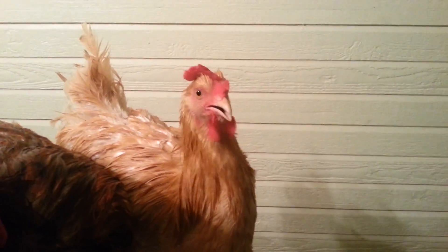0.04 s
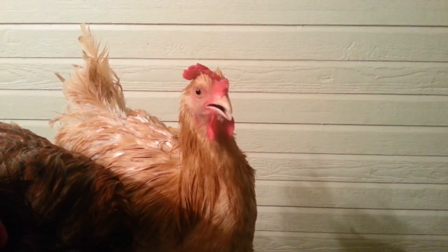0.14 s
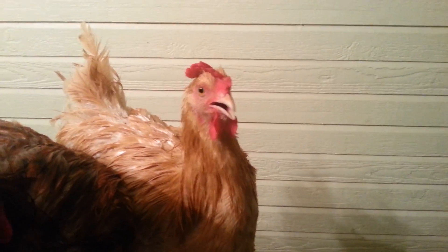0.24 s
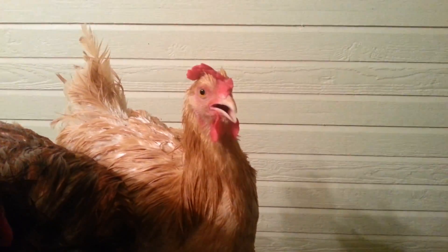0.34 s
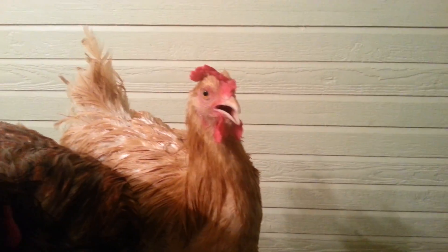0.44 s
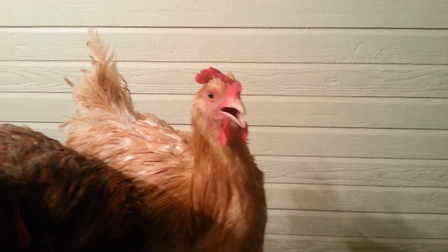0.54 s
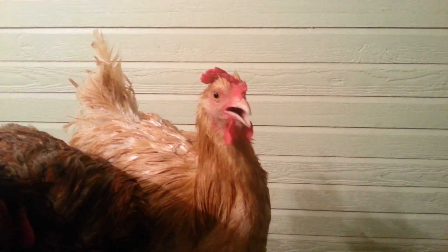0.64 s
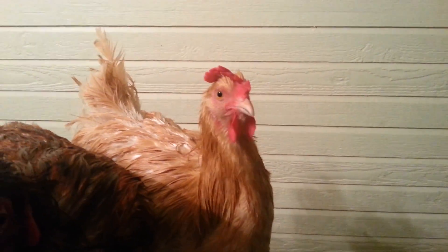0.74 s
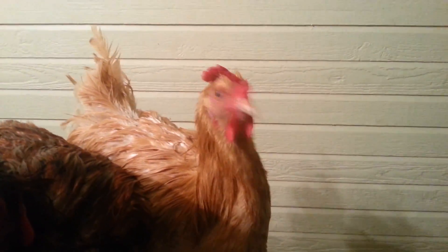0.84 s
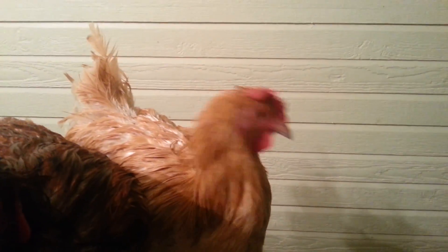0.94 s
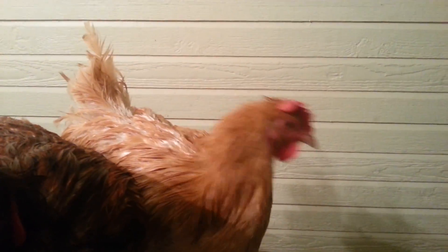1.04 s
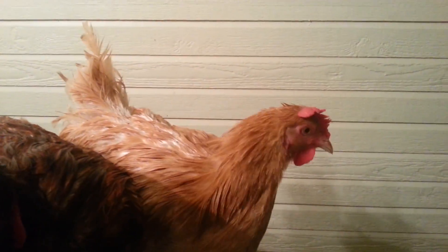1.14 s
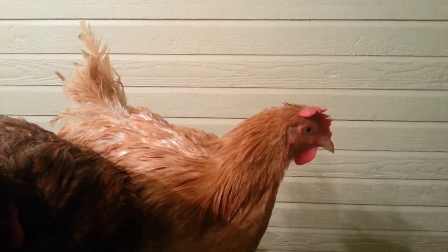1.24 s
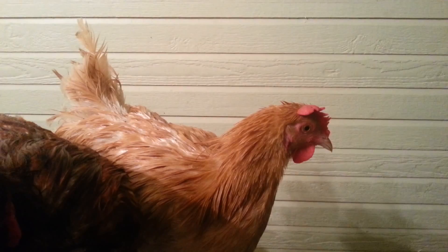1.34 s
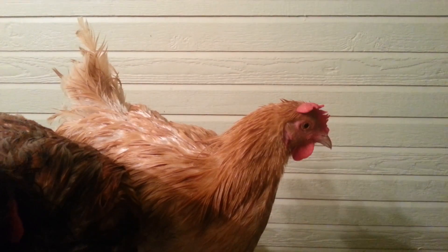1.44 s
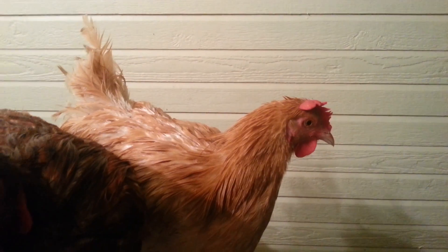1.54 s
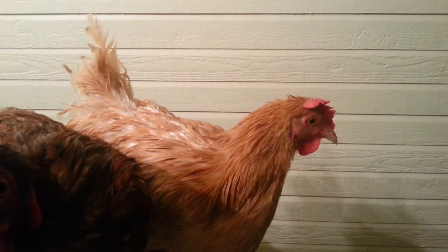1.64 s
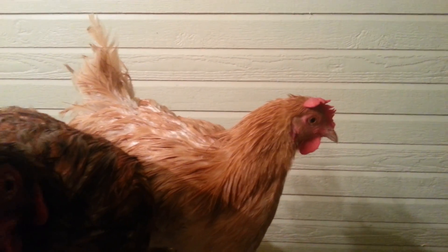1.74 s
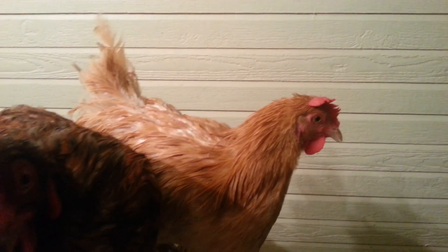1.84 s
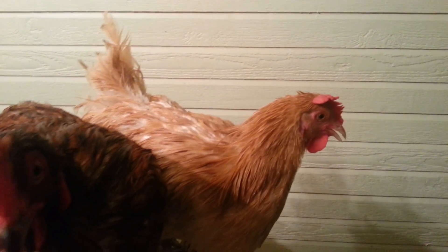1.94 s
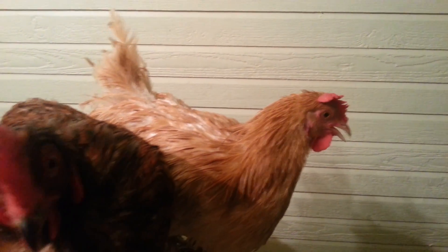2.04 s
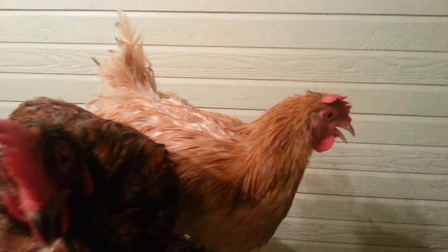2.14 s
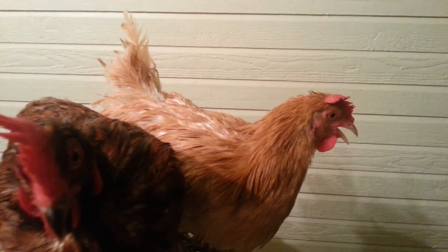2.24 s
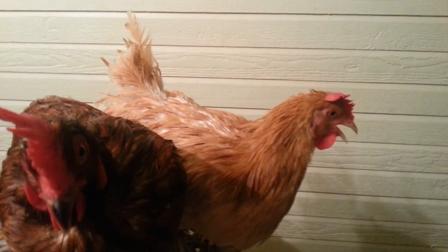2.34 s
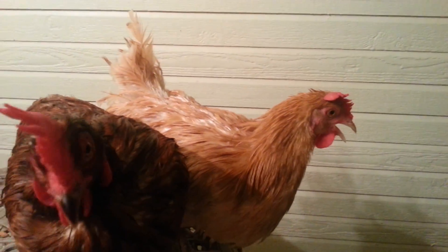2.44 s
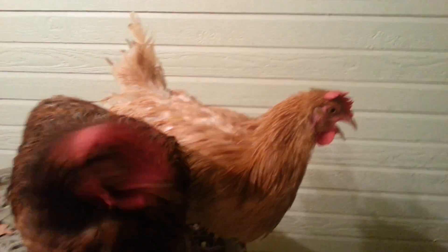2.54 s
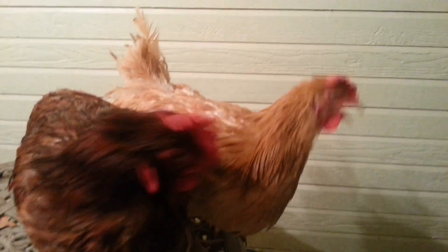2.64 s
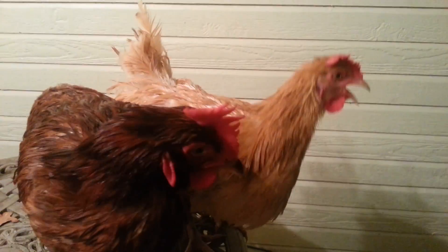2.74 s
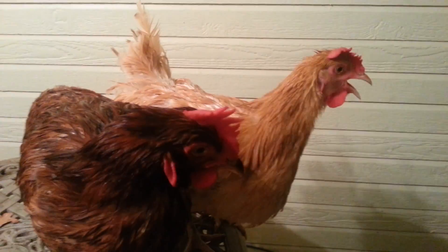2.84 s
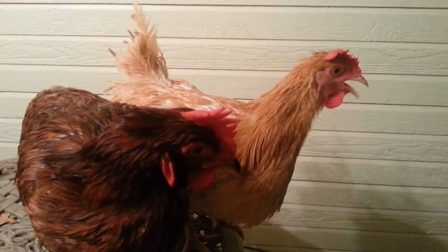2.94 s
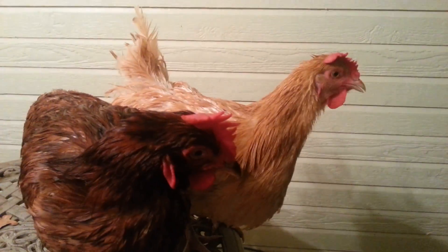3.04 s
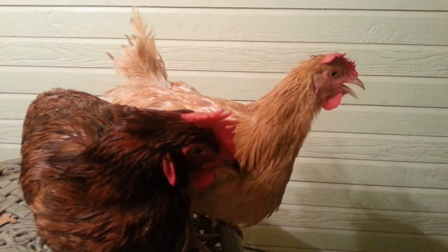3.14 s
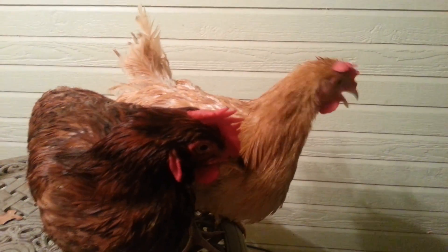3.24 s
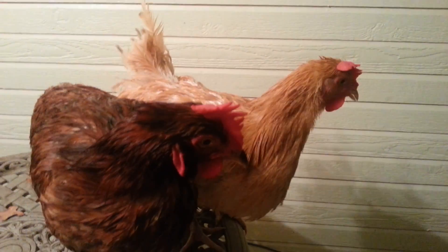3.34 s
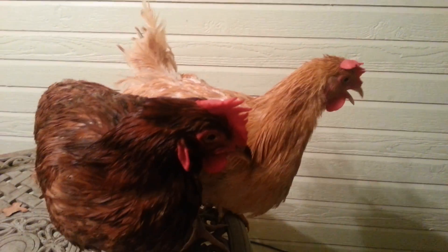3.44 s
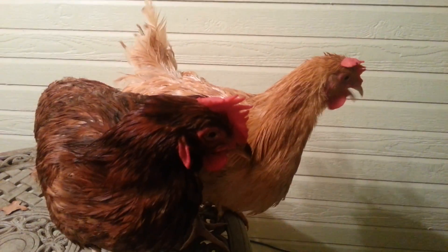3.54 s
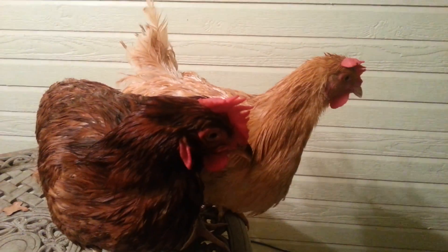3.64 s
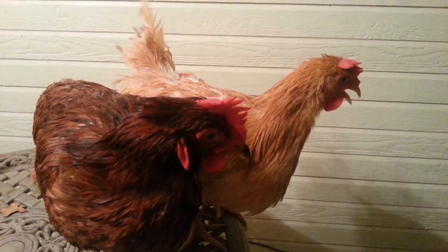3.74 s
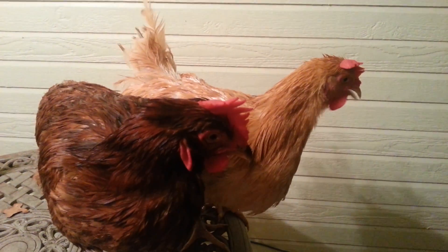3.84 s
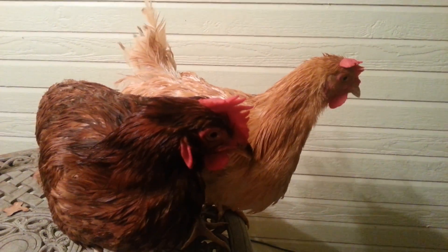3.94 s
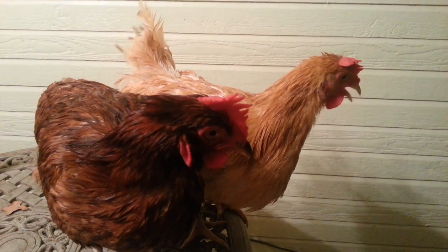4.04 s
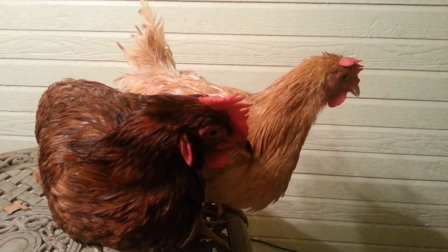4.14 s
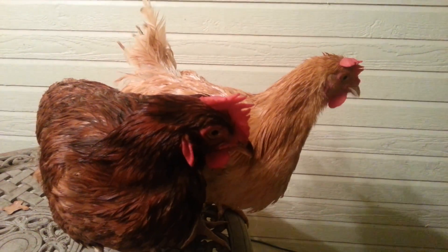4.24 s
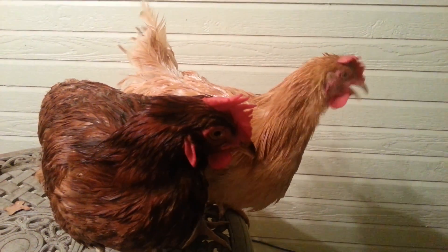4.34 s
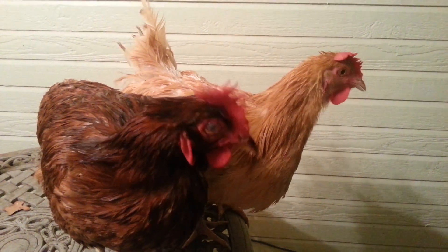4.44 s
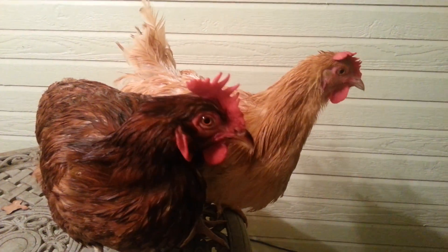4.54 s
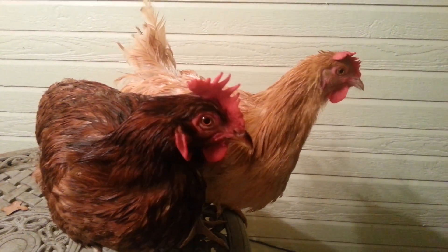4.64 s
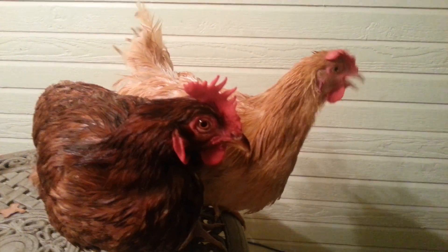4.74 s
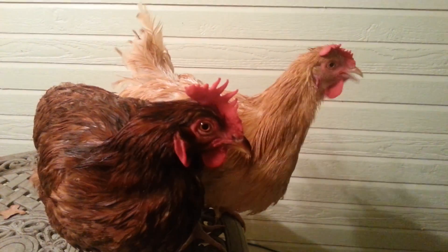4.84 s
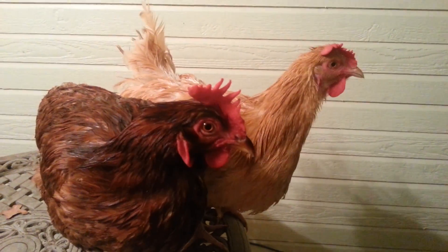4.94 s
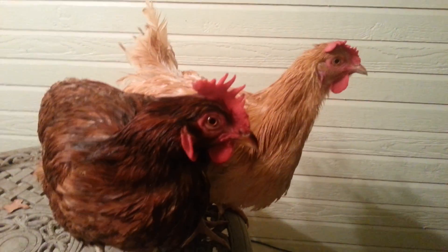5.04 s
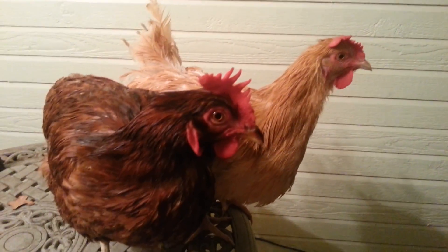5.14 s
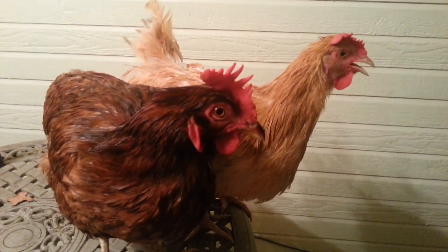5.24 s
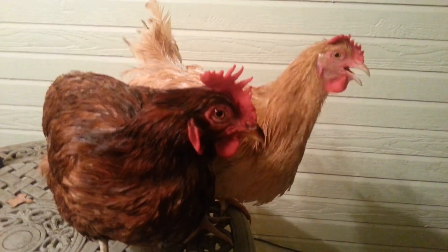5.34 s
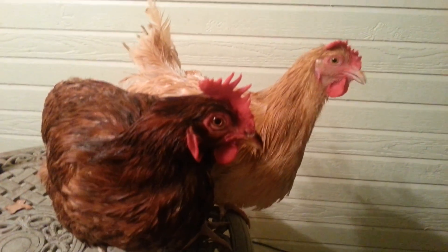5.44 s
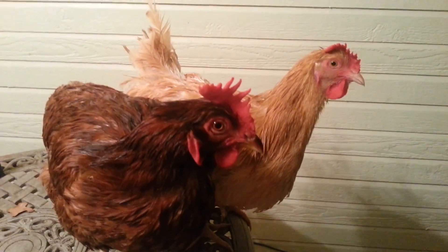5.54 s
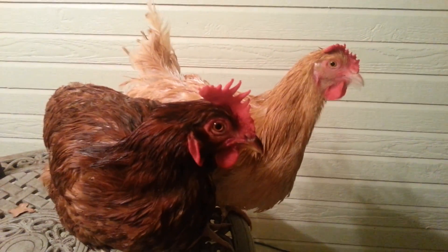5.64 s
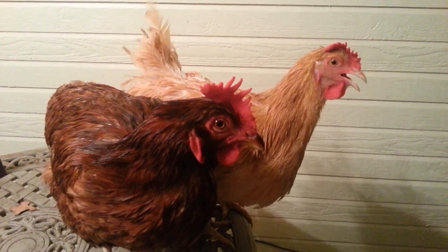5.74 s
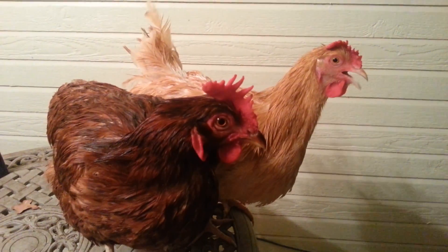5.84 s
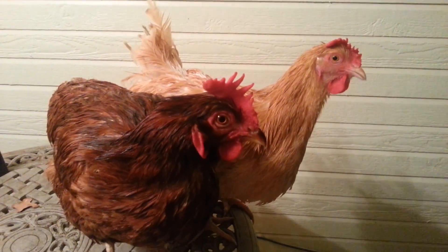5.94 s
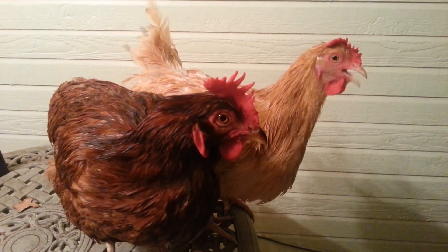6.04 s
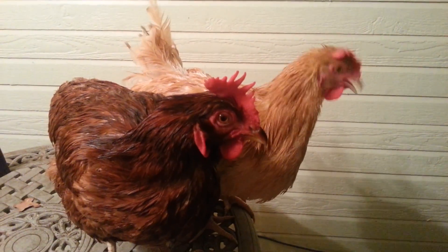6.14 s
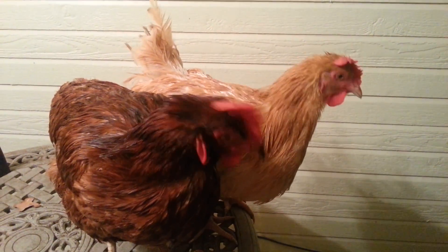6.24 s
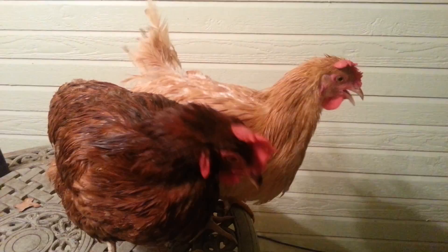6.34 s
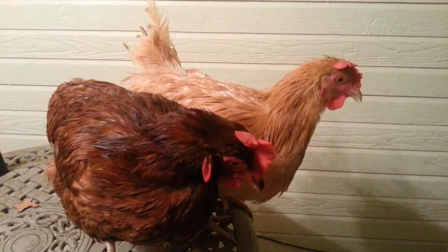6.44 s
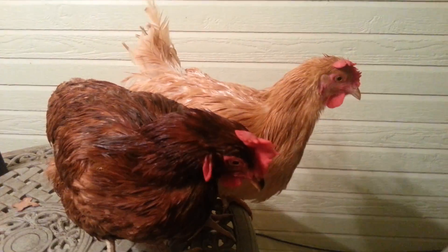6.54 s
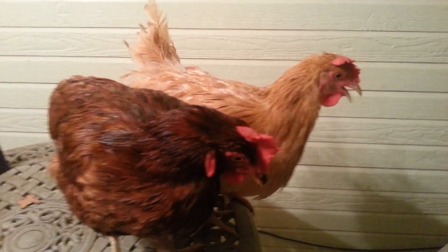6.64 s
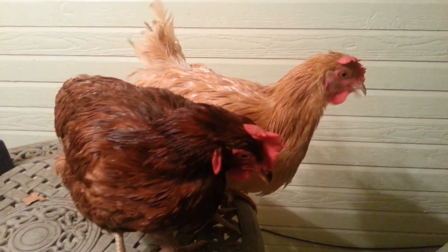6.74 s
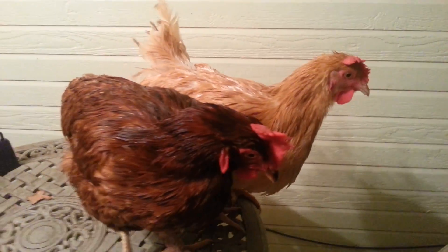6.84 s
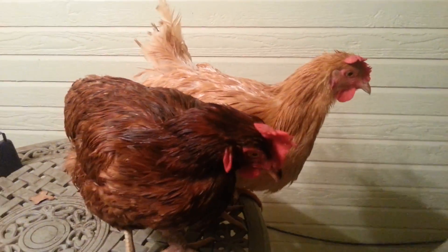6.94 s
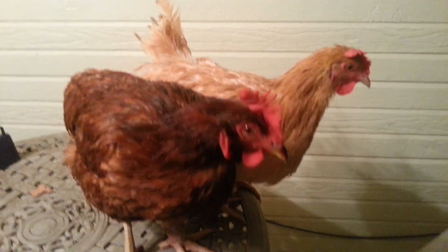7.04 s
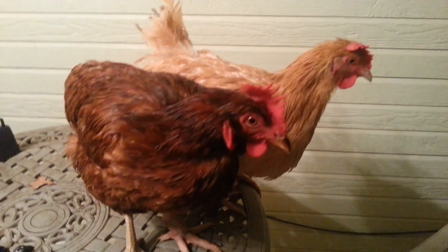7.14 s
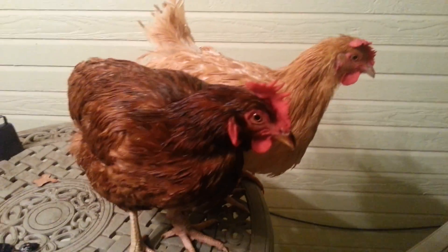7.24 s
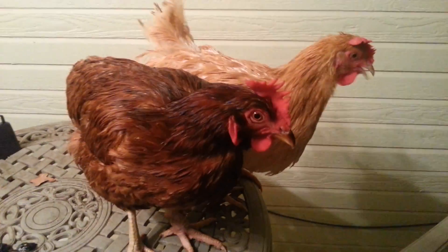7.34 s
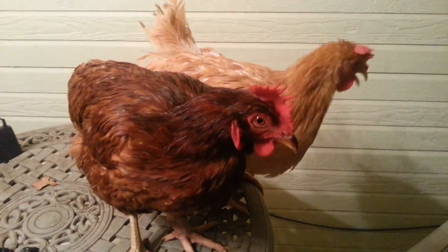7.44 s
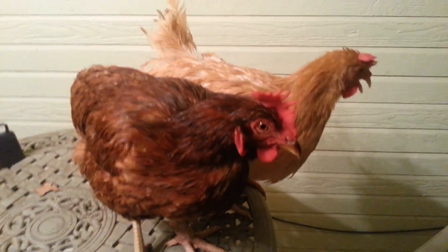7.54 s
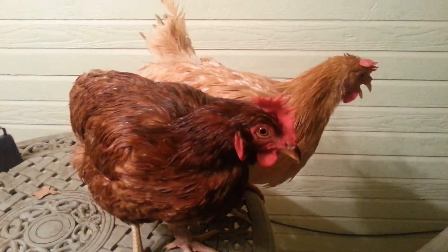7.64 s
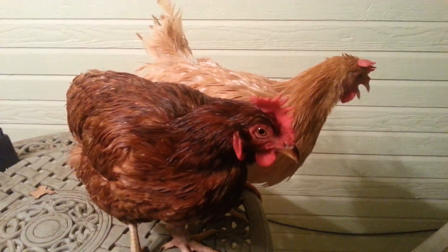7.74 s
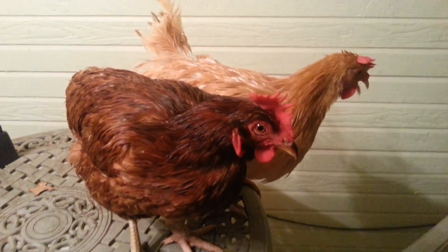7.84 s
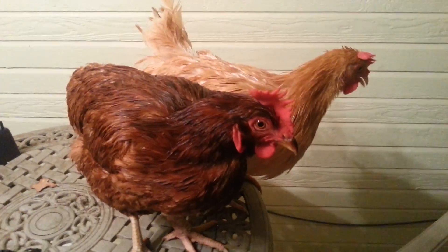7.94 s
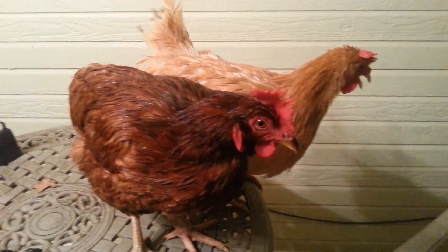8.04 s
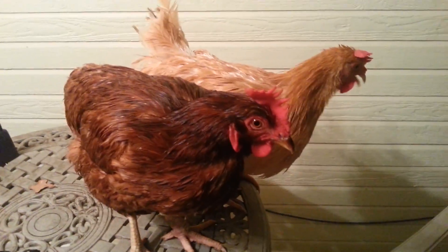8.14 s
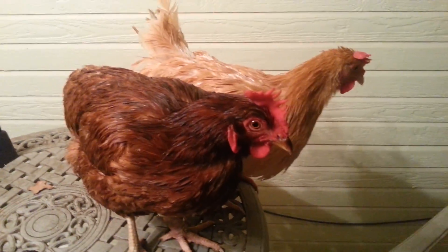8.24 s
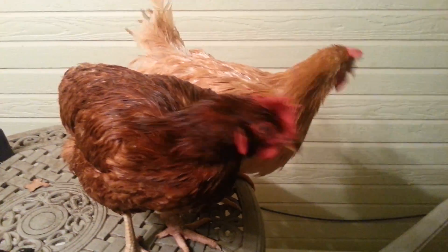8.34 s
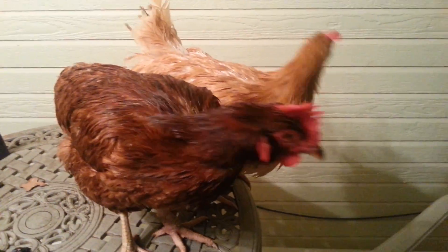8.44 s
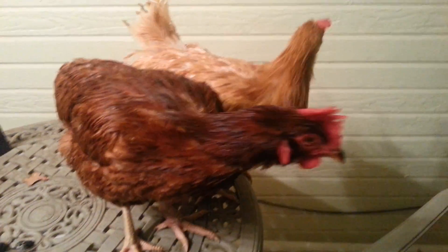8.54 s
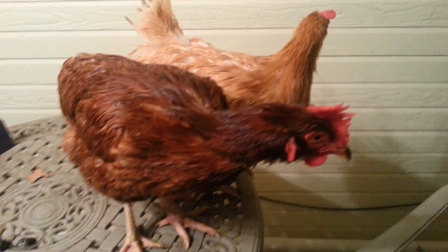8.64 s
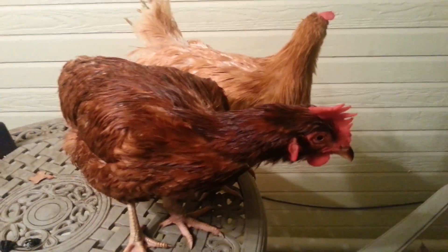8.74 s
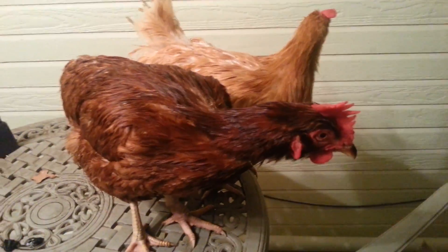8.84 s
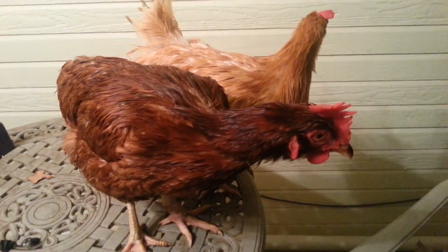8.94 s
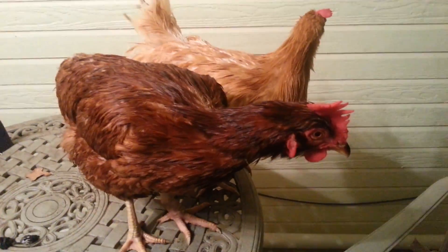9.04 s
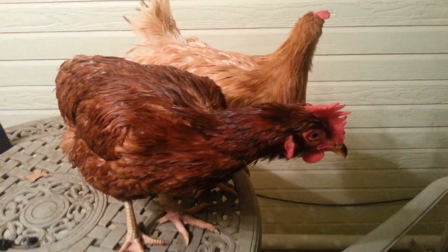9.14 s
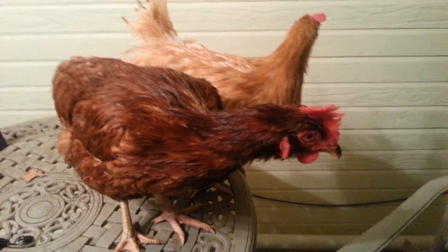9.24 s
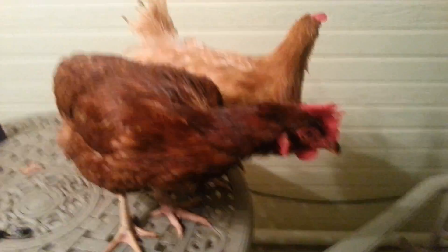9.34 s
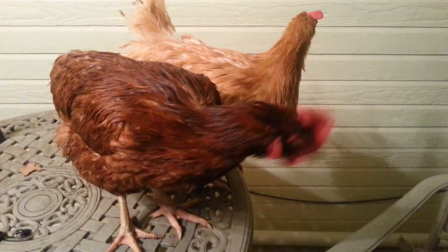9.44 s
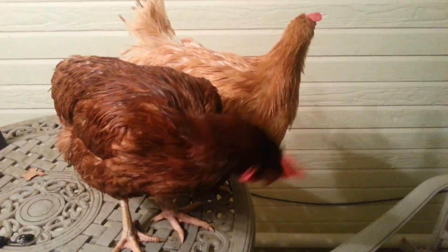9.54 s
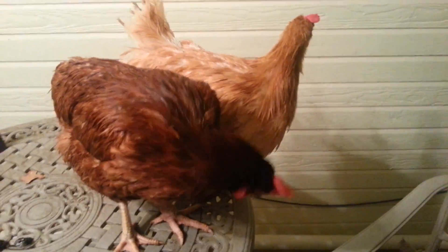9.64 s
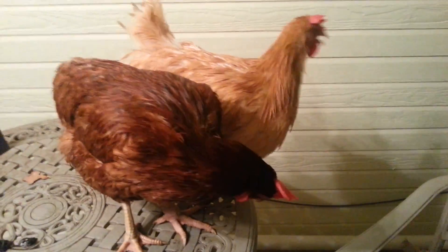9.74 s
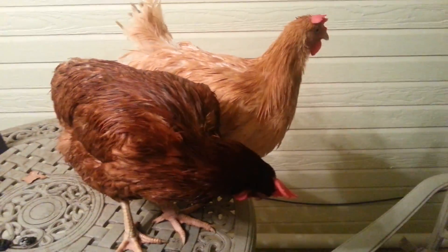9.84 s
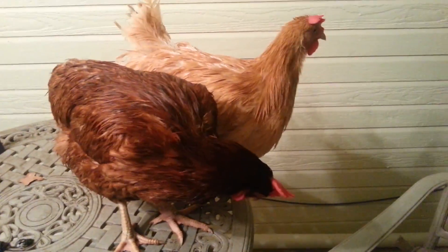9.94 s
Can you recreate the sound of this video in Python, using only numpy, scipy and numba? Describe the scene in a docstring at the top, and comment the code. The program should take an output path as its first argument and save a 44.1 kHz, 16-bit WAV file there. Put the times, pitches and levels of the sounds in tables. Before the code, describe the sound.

On a patio at night, a hen close to a stereo microphone opens mid-squawk, harsh and raspy. After a pause with tiny claw ticks she gives a longer squawk that breaks into clear tone, while a second hen adds one low cluck. A run of short clucks follows, then another squawk and more clucks. Nearby wall and table reflect slightly; soft air noise and low hum lie beneath.

```python
"""A hen's harsh squawk comes first, close to a stereo microphone on a patio at night, by a sided wall.
She stands on a table and goes on squawking and clucking: two membranes of the syrinx beat against
each other as a rasp, then her calls snap into a clear tone, coloured by windpipe and beak.
A second hen gives one low cluck from pulses in a single resonance; claws tick on the table as noise bursts.
Table and wall return echoes; behind lie shaped outdoor noise, a low hum and a faint high whine."""
import sys
import numpy as np
from scipy import signal
from scipy.fft import rfft, irfft, next_fast_len
from scipy.io import wavfile
from scipy.ndimage import uniform_filter1d, minimum_filter1d, map_coordinates
from numba import njit

SR = 44100
rng = np.random.default_rng(int(sys.argv[2]) if len(sys.argv) > 2 else 0)


def unload_wav(signal):
    """Save mono or channel-first audio to the path in sys.argv[1] as 16-bit WAV at rate SR, clipped to [-1, 1]."""
    wavfile.write(
        sys.argv[1],
        SR,
        np.round(np.clip(np.atleast_2d(signal).T, -1, 1) * 32767).astype(np.int16),
    )


N = 440118
TIME = np.arange(N) / SR
SIZE = next_fast_len(N + SR // 2)  # leaves room for the patio's tail
FREQ = np.fft.rfftfreq(SIZE, 1 / SR)


def amp(db):
    """Decibels to gain."""
    return 10 ** (np.asarray(db) / 20)


def unit(x):
    """Scaled to rms 1."""
    return x / np.sqrt(np.mean(x ** 2) + 1e-20)


def ramp(x):
    """Held between 0 and 1."""
    return np.clip(x, 0, 1)


def mix(a, b, share):
    """From a at share 0 to b at share 1."""
    return a + (b - a) * share


def along(points, hz=FREQ):
    """(f/Hz, value) points read on a log axis."""
    f, v = np.transpose(points)
    return np.interp(np.log(hz + 1), np.log(f + 1), v)


def curves(rows, t=TIME):
    """Each column after the time, joined by straight lines."""
    s, *cols = np.transpose(rows)
    return [np.interp(t, s, c) for c in cols]


def wobble(rate):
    """A smooth random curve, rate knots a second."""
    knots = rng.standard_normal(int(N * rate / SR) + 4)
    return map_coordinates(knots, [TIME * rate])


def filtered(x, response):
    """x through a frequency response."""
    return irfft(rfft(x, SIZE) * response, SIZE)[..., :N]


def causal(db):
    """The minimum-phase response with this gain: it rings only after a pulse."""
    cepstrum = irfft(np.log(amp(db)), SIZE)
    cepstrum[1:SIZE // 2] *= 2
    cepstrum[SIZE // 2 + 1:] = 0
    return np.exp(rfft(cepstrum))


def resonance(hz, width_hz):
    """The response of one resonance."""
    return 1j * FREQ * width_hz / (hz ** 2 - FREQ ** 2 + 1j * FREQ * width_hz)


@njit
def ring(x, hz, width_hz):
    """A resonance whose centre glides, with gain about 1 at its peak."""
    out, state = np.zeros(len(x)), 0j
    keep = np.exp(-np.pi * width_hz / SR)
    for i in range(len(x)):
        state = state * keep * np.exp(2j * np.pi * hz[i] / SR) + x[i]
        out[i] = 2 * (1 - keep) * state.real
    return out


def beats(pitch):
    """The times at which a membrane completes a cycle."""
    cycles = np.cumsum(pitch) / SR
    return np.interp(np.arange(1, cycles[-1]), cycles, TIME)


def pulses(times, sizes, order=8):
    """Sharp pulses placed between samples."""
    at = times[:, None] * SR
    taps = np.floor(at) + np.arange(1 - order, order + 1)
    shape = np.sinc(taps - at) * np.cos(np.pi * (taps - at) / (2 * order)) ** 2
    slots = np.clip(taps, 0, N).astype(int)
    return np.bincount(slots.ravel(), (sizes[:, None] * shape).ravel(), N + 1)[:N]


# moments in her calls when the second membrane nearly drops out: [middle t/s, length/s]
LULL_TIMES = [(.147, 0.031), (0.248, 0.032), (2.108, .02), (5.274, 0.0117), (9.36, 0.0231)]
# edge length in s, share of pitch lost, loss in the beak register in dB, rasp approached
LULL_EDGE_S, LULL_SAG, LULL_DB, LULL_RASP = .008, .04, 2.5, 0.17
# the second membrane's pitch over the first: it pulls away during a call, up to a limit
SECOND_RATIO, SECOND_DRIFT_PER_S, SECOND_MOST = 1.44, .3, 1.56
# in the rasp the beak resonance trembles: depth as a share of its pitch, random knots per s
BEAK_FLUTTER, FLUTTER_PER_S = 0.062, 170


def hen(edge_offset_db=2.5):
    """Each call gates the voice; effort and beak opening shift its weight between three registers."""
    gate, age, pitch, rasp, level, beak, edge, beak_hz, upper_hz = gestures()
    lull = sum(ramp((length / 2 - np.abs(TIME - s)) / LULL_EDGE_S + .5) for s, length in LULL_TIMES)
    pitch = pitch * (1 - LULL_SAG * lull)
    rasp = ramp(mix(rasp, LULL_RASP, lull))
    beak = beak - LULL_DB * lull
    second = pitch * np.minimum(SECOND_RATIO + SECOND_DRIFT_PER_S * age, SECOND_MOST)
    beak_hz = beak_hz * (1 + BEAK_FLUTTER * rasp * wobble(FLUTTER_PER_S))
    voice = throat(syrinx(pitch, second, rasp), rasp, beak_hz, upper_hz)
    # throat, beak and shrill edge registers, each evened out before its own level is applied
    below_beak = 1 / (1 + (FREQ / 1060) ** 20)
    below_edge = 1 / (1 + (FREQ / 2500) ** 20)
    bands = np.array([below_beak, below_edge - below_beak, 1 - below_edge])
    registers = filtered(voice, bands)
    strength = np.sqrt(np.abs(uniform_filter1d(registers ** 2, size=1100, axis=1)) + 1e-12)
    gains = gate * amp([level, beak, edge + edge_offset_db])
    return np.sum(gains * registers / strength, axis=0)


# the clucks, before the edge offset in hen(): [start t/s, length/s, swell/s, fall/s,
# break into tone after/s, pitch f/Hz at the break, later pitch of the tone f/Hz,
# rasp left in the tone/0-1, throat level/dB, beak register in the rasp and in the tone/dB re throat,
# shrill edge/dB re throat, beak resonance f/Hz, upper resonance f/Hz]
CLUCK_CALLS = [ (3.095, 0.19, 0.02, 0.041, 0.055, 430.3, 467, 0.059, -12.5, 2, -2, -12, 1290, 3164),
               (3.393, 0.15, 0.012, .026, 0.041, 425, 468.2, 0.13, -11.5, -2, -3.5, -13, 1140, 3220),
               (3.7, .13, 0.023, .03, 0.068, 458.6, 462.5, 0.11, -12, 3.5, -5.5, -12.5, 1156, 3200),
               (3.972, 0.12, .02, .03, 0.075, 451.2, 449, 0.14, -12.5, 4, -6.5, -14, 1173, 3170),
               (4.26, .112, 0.02, .024, .028, 380.7, 428, 0.32, -13, 1.5, -3, -13, 1142, 3160),
               (4.677, 0.16, 0.028, 0.029, 0.1, 390, 391.8, 0.74, -13.5, 2.5, 3, -13, 1150, 3126),
               (5.181, .229, 0.035, 0.051, 0.18, 428.2, 409.2, .25, -15, 4, -0.5, -10.5, 1144, 3120),
               (5.657, 0.21, 0.024, .035, 0.16, 423.2, 424.2, 0.4, -14, 3, -1, -10.5, 1103, 3118),
               (6.005, 0.14, 0.028, .026, .06, 426.3, 434.5, 0.099, -12.5, 0.5, -1, -11, 1260, 3225),
               (6.313, 0.1, 0.0063, .022, 0.067, 405.4, 406, 0.81, -14.5, 5, 4, -10, 1240, 3480),
               (6.627, .114, 0.017, .02, 0.065, 399.8, 429.8, 0.41, -14.5, 3.5, 0, -12.5, 1150, 3470),
               (7.993, .155, 0.027, .036, .085, 432, 473.7, 0.26, -13, 6.5, 0, -6, 1170, 3310),
               (8.276, .124, 0.022, .022, 0.025, 391.6, 465.5, 0.24, -12, -1, -1, -8, 1094, 3223),
               (8.556, 0.098, 0.015, .012, 0.075, 425.4, 420.7, .15, -15.5, 8.5, 10.5, -7, 1241, 3205),
               (8.946, 0.16, .025, .014, .062, 420, 436, 0.11, -16, 8, 3.5, -7.5, 1294, 3239),
               (9.308, 0.15, 0.019, 0.016, .09, 430.6, 433, 0.19, -17, 6, 8, -8.5, 1310, 3210),
               (9.66, 0.11, .016, 0.017, 0.072, 426, 416, 0.23, -13.5, 6, 7.5, -11.5, 1260, 3220)]
# every cluck starts low and harsh, and steadies as it climbs
START_HZ, START_RASP, LATE_RASP = 359.8, 0.95, 0.741
# the snap into tone: its length, share by which the pitch jumps
BREAK_S, BREAK_JUMP = 0.013, .04
# shares of the tone spent at the break pitch, then moving up or down to the later pitch
MOVE_WAIT, MOVE_SHARE = .26, .44
# the push gives out: share of pitch lost, level lost, rasp regained
FALL_SAG, FALL_DB, FALL_RASP = .14, 8, 0.076
# gain over the swell, extra gain of the overtones, brightening as the rasp climbs
SWELL_DB, SWELL_BRIGHT_DB, CLIMB_BRIGHT_DB = 4, 5, 3.5
# the tone starts dull: beak register and shrill edge regain this much over its length
TONE_BRIGHT_DB, TONE_EDGE_DB = 2.5, 0.5
# shares by which the beak resonance starts low and sinks in the fall
BEAK_SHUT, BEAK_CLOSE = 0.069, 0.036


def cluck(t, start, length, swell_s, fall_s, break_s, break_hz, later_hz, rasp_left, throat_db,
          rasp_beak_db, tone_beak_db, edge_db, beak_hz, upper_hz):
    """A climbing rasp snaps into a tone, which moves to its later pitch and sags as the push gives out."""
    age = t - start
    shut, climb = 1 - ramp(age / swell_s), ramp(age / break_s)
    tone = ramp((age - break_s) / BREAK_S + .5)
    fall = ramp((age - length) / fall_s + 1)
    through_tone = (age - break_s) / max(length - fall_s - break_s, BREAK_S)
    move = np.sin(np.pi / 2 * ramp((through_tone - MOVE_WAIT) / MOVE_SHARE)) ** 2

    rasp_pitch = mix(START_HZ, break_hz * (1 - BREAK_JUMP), climb)
    tone_pitch = mix(break_hz, later_hz, move)
    pitch = mix(rasp_pitch, tone_pitch, tone) * (1 - FALL_SAG * fall ** 2)
    rasp = mix(mix(START_RASP, LATE_RASP, climb), rasp_left, tone) + FALL_RASP * fall

    level = throat_db - SWELL_DB * shut - FALL_DB * fall ** 2
    bright = level - SWELL_BRIGHT_DB * shut
    regain = ramp(through_tone) - .5
    rasp_beak = rasp_beak_db + CLIMB_BRIGHT_DB * (climb - .5)
    tone_beak = tone_beak_db + TONE_BRIGHT_DB * regain
    beak = bright + mix(rasp_beak, tone_beak, tone)
    edge = bright + edge_db + TONE_EDGE_DB * regain * tone
    opening = 1 - BEAK_SHUT * (1 - climb) ** 2 - BEAK_CLOSE * fall
    return [pitch, rasp, level, beak, edge, beak_hz * opening, np.full(len(t), upper_hz)]


# syrinx of the three long squawks, one list each: [t/s, pitch f/Hz, rasp/0-1]
SQUAWK_MEMBRANES = [
    [(0, 379, 0.61), (.2, 394.4, 0.75), (.44, 400.2, 0.6), (.53, 411.9, 0.43), (.542, 438, 0.13),
     (.565, 443.5, 0.12), (.59, 420, 0.19), (.655, 405, .25)],
    [(1.77, 277.6, 0.89), (1.95, 380.8, 0.86), (2.1, 402.2, 0.96), (2.305, 398, .95), (2.325, 394.5, .04),
     (2.345, 413, .08), (2.45, 436, 0), (2.57, 451.3, 0), (2.598, 478.5, 0.19), (2.615, 461.6, 0.3),
     (2.66, 457, .22), (2.68, 466, .63), (2.708, 483, 0.47), (2.725, 489, .11), (2.79, 465, 0),
     (2.84, 486.6, 0.07), (2.925, 480, 0), (2.945, 454, 0.09), (2.97, 392.3, 0.36)],
    [(7.335, 350.6, 0.97), (7.45, 384.5, 0.77), (7.695, 396.5, 0.87), (7.712, 390, 0.28),
     (7.745, 410.2, 0.17), (7.785, 456.3, 0.08), (7.802, 504, 0.08), (7.822, 501, 0.38),
     (7.842, 430.6, 0.77), (7.95, 376.1, .9)],
]
# their voice, before the level offsets: [t/s, throat register level/dB, beak register level/dB,
# shrill edge level/dB, beak resonance f/Hz, upper resonance f/Hz]
SQUAWK_REGISTERS = [
    [(0.0, -15, -14.5, -27, 1240, 3800), (0.222, -17, -11.5, -26, 1285, 3560),
     (0.244, -16.5, -17, -26.5, 1190, 3450), (0.262, -15.5, -12, -25, 1150, 3660),
     (0.44, -15, -9.5, -24, 1250, 3460), (0.528, -13, -6, -24, 1240, 3480),
     (0.542, -15.5, -16, -26.5, 1260, 3476), (0.634, -14.5, -9.5, -28, 1230, 3460),
     (0.65, -19.5, -13, -29.5, 1250, 3350)],
    [(1.77, -28, -45, -51, 936, 3594), (1.816, -20.5, -31.5, -38, 1080, 3669),
     (1.966, -16, -15.5, -33, 1225, 3960), (2.194, -17.5, -12.5, -33, 1250, 3740),
     (2.308, -17.5, -9.5, -29, 1310, 3600), (2.334, -16.5, -19.5, -32, 1210, 3550),
     (2.374, -16.5, -18, -31.5, 910, 3330), (2.44, -11.5, -20.5, -37.5, 880, 3360),
     (2.504, -9, -25, -35, 870, 3430), (2.562, -10, -19.5, -34, 915, 3700),
     (2.588, -17.5, -17, -35.5, 1010, 3370), (2.634, -11.5, -13, -19.5, 1030, 3240),
     (2.682, -15, -10, -22.5, 1070, 3230), (2.728, -13, -17, -22, 1040, 3270),
     (2.872, -17.5, -18.5, -23, 1110, 3080), (2.908, -19.5, -16.5, -30.5, 1100, 3280),
     (2.938, -9.5, -16, -19, 1040, 3147), (2.97, -23, -20, -30, 1070, 3106)],
    [(7.335, -22.5, -24.5, -37, 1150, 3350), (7.383, -15.5, -15, -27.5, 1130, 3800),
     (7.453, -15, -9, -26.5, 1360, 3740), (7.741, -17.5, -9.5, -19.5, 1150, 3340),
     (7.779, -13, -21.5, -27.5, 1090, 3460), (7.825, -14.5, -19.5, -19.5, 1050, 3470),
     (7.845, -21, -14.5, -25, 1190, 3290), (7.935, -20.5, -25.5, -38.5, 1150, 3120),
     (7.95, -30, -40, -64, 1100, 3210)],
]
# level offset of each squawk register, ahead of the edge offset in hen(): [throat/dB, beak/dB, edge/dB]
SQUAWK_REGISTER_DB = (-0.1, 1, 0.5)


def squawk(t, syrinx_rows, voice_rows):
    """A long drawn call whose rasp gives way to clearer tone and may fray again."""
    level, beak, edge, beak_hz, upper_hz = curves(voice_rows, t)
    levels = np.array([level, beak, edge]) + np.array(SQUAWK_REGISTER_DB)[:, None]
    return [*curves(syrinx_rows, t), *levels, beak_hz, upper_hz]


LEAD_S = .025  # the syrinx is set this long before a call


def gestures(attack=0.013, release=0.004):
    """All calls in turn: gate, age, pitch, rasp, three register levels and two resonances per sample."""
    calls = [(row[0], row[0] + row[1], cluck, row) for row in CLUCK_CALLS]
    for rows, voice in zip(SQUAWK_MEMBRANES, SQUAWK_REGISTERS):
        calls.append((rows[0][0], rows[-1][0], squawk, (rows, voice)))
    calls.sort(key=lambda call: call[0])
    turns = np.split(TIME, [int((call[0] - LEAD_S) * SR) for call in calls[1:]])
    parts = []
    for t, (start, end, shape, values) in zip(turns, calls):
        gate = ramp((t - start) / attack + .5) * ramp((end - t) / release + .5)
        parts.append(np.array([gate, t - start, *shape(t, *values)]))
    return np.concatenate(parts, axis=1)


def syrinx(pitch, second, rasp, pull=.11, sway_db=4, scatter_db=5.5, second_db=-3,
           hiss_db=-33, rasp_hiss_db=-19):
    """One pulse a cycle; in the rasp a second membrane joins in and upsets their timing and size."""
    pitch = pitch * (1 + (0.0022 + 0.01408 * rasp) * wobble(90))
    second = second * (1 + .014 * wobble(80))

    t = beats(pitch)
    rough, period = np.interp(t, TIME, rasp), 1 / np.interp(t, TIME, pitch)
    swing = 2 * np.pi * np.interp(t, TIME, np.cumsum(second) / SR)  # phase of the second membrane
    chance = rng.standard_normal((len(t), 2))
    jitter = .003 + .055 * rough ** 2
    late = rough * pull * np.sin(swing) + jitter * chance[:, 0]  # in periods
    size_db = rough * (sway_db * np.cos(swing) + scatter_db * chance[:, 1])
    first_membrane = pulses(t + late * period, amp(size_db))

    t = beats(second)
    rough, period = np.interp(t, TIME, rasp), 1 / np.interp(t, TIME, second)
    chance = rng.standard_normal((len(t), 2))
    jitter = .004 + .045 * rough ** 2  # in periods
    sizes = rough * amp(second_db + scatter_db * rough * chance[:, 1])
    second_membrane = pulses(t + jitter * period * chance[:, 0], sizes)

    # air escapes in a puff each time the first membrane opens
    opening = np.cos(np.pi * np.cumsum(pitch) / SR) ** 2
    puffs = unit(opening * rng.standard_normal(N))
    hiss = puffs * (amp(hiss_db) + amp(rasp_hiss_db) * rasp)
    return unit(first_membrane + second_membrane) + hiss


# windpipe and beak under the rasp: [f/Hz, level/dB]
RASP_COLOUR = [(60, -81), (200, -25.5), (380, -17), (550, -5.5), (680, -10), (820, -0.5), (950, -4),
               (1190, -2), (1500, -8.5), (2000, -19), (2600, -29), (3250, -28), (3800, -29), (4600, -25.5),
               (5100, -38)]
# windpipe and beak under the clear tone: [f/Hz, level/dB]
TONE_COLOUR = [(60, -81), (200, -43.5), (440, -0.5), (650, 2.5), (900, 10), (1300, -5), (1600, -6.5),
               (1900, -14), (2200, -15), (2600, -18), (3300, -16), (3800, -19.5), (4600, -14), (5100, -25)]
# top resonances, added to both: [f/Hz, level/dB]
TOP_COLOUR = [(4000, 6.5), (5200, 9.5), (6000, 13.5), (6900, 9.5), (7800, 10.5), (9000, 3), (10500, -36),
              (13800, -23), (15000, -26.5)]
# colour with her neck upright: [f/Hz, level/dB]
UPRIGHT_COLOUR = [(550, 1), (750, 0), (950, -1.5), (1240, 1.5), (1500, -6), (1720, -3.5), (1950, -4.5),
                  (2250, -13), (2650, 3.5), (3400, 3), (5200, -6), (6400, -4), (8000, 2.5), (9500, 4)]
RASP_DAMPING = 0.3  # share by which full rasp weakens the upper resonance


def throat(source, rasp, beak_hz, upper_hz, beak_width_hz=130, beak_db=2, middle_ratio=0.622,
           middle_width_hz=320, middle_db=-1, upper_width_hz=170, upper_db=15.0):
    """The windpipe's fixed colours, then three resonances in a row that move as the beak opens."""
    blend = ramp(rasp / 0.66)
    harsh = filtered(source * blend, causal(along(RASP_COLOUR) + along(TOP_COLOUR)))
    clear = filtered(source * (1 - blend), causal(along(TONE_COLOUR) + along(TOP_COLOUR)))
    voice = harsh + clear
    upright = (TIME < 1) | (TIME > 8.48)
    voice = np.where(upright, filtered(voice, causal(along(UPRIGHT_COLOUR))), voice)
    moving = [
        (beak_hz, beak_width_hz, amp(beak_db)),
        (middle_ratio * upper_hz, middle_width_hz, amp(middle_db)),
        (upper_hz, upper_width_hz, amp(upper_db) * (1 - RASP_DAMPING * rasp))]
    for hz, width_hz, gain in moving:
        voice = voice + gain * ring(voice, hz, float(width_hz))
    return uneven(voice)


def uneven(x):
    """A smooth random colouring makes the overtones uneven over pitch and time, more so higher up."""
    hz, _, z = signal.stft(x, SR, nperseg=512)
    field = rng.standard_normal(z.shape)
    field = uniform_filter1d(field, size=4, axis=0)  # smooth over pitch
    field = uniform_filter1d(field, size=18, axis=1)  # smooth over time
    depth_db = along([(500, .7), (1500, 1.6), (5000, 2.8)], hz)[:, None]
    return signal.istft(z * amp(depth_db * unit(field)), nperseg=512)[1][:N]


# treble beamed at the microphone: [t/s, level/dB]
BEAM = [(0, -11), (.6, -2.5), (1.9, 1.5), (2.5, 9.5), (2.9, -0.5), (3.8, 2), (4.7, 1.5), (6, -0.5),
        (6.5, 3.5), (7.5, -1), (8.3, -5), (9, -1), (9.8, 1.5)]


def beamed(voice, from_hz=4200):
    """The highest overtones leave the beak in a beam that swings with her head."""
    treble = filtered(voice, 1 - 1 / (1 + (FREQ / from_hz) ** 10))
    return voice + (amp(curves(BEAM)[0]) - 1) * treble


# the second hen's cluck: [t/s, pitch f/Hz, level/dB]
SECOND_HEN = [(2.35, 290, -24), (2.385, 261, -13), (2.412, 207.5, -14), (2.427, 224, -17), (2.44, 216, -64)]


def other_hen():
    """A short low cluck with closed beak, falling overall: one low resonance, applied twice."""
    pitch, level = curves(SECOND_HEN)
    t = beats(pitch * (1 + 0.035 * wobble(150)))
    source = pulses(t, amp(2 * rng.standard_normal(len(t))))
    voice = unit(filtered(source, resonance(432, 170) ** 2))
    return voice * amp(level) * (TIME > SECOND_HEN[0][0]) * (TIME < SECOND_HEN[-1][0])


# claws on the table: [t/s, level/dB at the onset, centre f/Hz, width/Hz of each of two passes, t60/s]
CLAW_TICKS = [(0.775, -29, 9050, 3500, 0.062), (1.018, -37.5, 9600, 2000, 0.054),
              (1.19, -36.5, 6330, 1000, 0.24), (5.03, -39, 9800, 3000, .03),
              (9.261, -25.5, 9900, 5040, 0.043)]


def claws():
    """Small bright scratches: resonant noise that starts at once and dies quickly."""
    out = np.zeros(N)
    for s, db, hz, width_hz, t60 in CLAW_TICKS:
        age = np.maximum(TIME - s, 0)
        scratch = unit(filtered(rng.standard_normal(N), resonance(hz, width_hz) ** 2))
        out += (age > 0) * amp(db - 60 * age / t60) * scratch
    return out


# where her head points: [t/s, left-right level/dB, lead of the left capsule/s]
HEAD_TURNS = [(0, 3.9, -.00003), (.8, 3.9, -.00003), (1.7, 4.4, .00008), (6.8, 4, .00009),
              (7.3, -.2, .0001), (8.4, .4, .0001), (8.6, .3, .00003), (9, -1.3, .00004),
              (9.4, -2.4, .00004), (9.98, -1.5, .00004)]
# echoes from table and wall: [left delay/s, right delay/s, level/dB]
TABLE_AND_WALL = [(.0021, .0029, -38), (.0052, .0043, -23), (.0083, .0097, -13)]
# decay of the patio's tail: [f/Hz, t60/s]
PATIO_DECAY = [(200, 0.42), (1200, 0.26), (3200, 0.4), (12000, 0.027)]


def patio(x, tail_db=-15, build=0.015):
    """Direct sound reaches the two capsules at slightly different times, with echoes and a short tail."""
    balance_db, lead = curves(HEAD_TURNS)
    direct = np.array([map_coordinates(x, [(TIME + side * lead) * SR]) for side in (.5, -.5)])
    echoes = 0
    for left, right, db in TABLE_AND_WALL:
        delays = np.array([[left], [right]])
        echoes = echoes + amp(db) * np.exp(-2j * np.pi * FREQ * delays)
    # the tail is noise that builds up, then decays at its own rate in each band
    hz, t, z = signal.stft(rng.standard_normal((2, SR // 2)), SR, nperseg=256)
    decay = amp(-60 * t / along(PATIO_DECAY, hz)[:, None])
    tail = signal.istft(z * decay * (1 - np.exp(-t / build)), SR, nperseg=256)[1]
    tail = tail / np.linalg.norm(tail[0])
    around = filtered(x, echoes + amp(tail_db) * rfft(tail, SIZE))
    return (direct + around) * amp(np.array([[.5], [-.5]]) * balance_db)


# colour of the outdoor air, relative: [f/Hz, level/dB per Hz]
AIR_COLOUR = [(20, -46), (60, -16), (105, -12.5), (150, -21), (220, -1), (330, -16.5), (420, -11.5),
              (800, -7), (1050, -13), (2500, -13), (3500, -17), (6000, -21.5), (10000, -26), (14500, -39.5)]
# how alike the air is at the two capsules: [f/Hz, likeness/0-1]
AIR_LIKENESS = [(60, 1), (150, 0.012), (380, 1), (950, 0.25), (2380, 0.3), (5960, 0.23), (15000, 0.0081)]
# bands of the hum, relative: [f/Hz, width/Hz, level/dB]
HUM_BANDS = [(149, 26, -5.5), (161.8, 44, -1), (190.4, 20, -5.5), (260, 11.5, -1), (296.6, 116, -1.5)]
# the faint whine creeps upward
WHINE_HZ, WHINE_RISE_HZ_PER_S, WHINE_WANDER_HZ = 8360, 99, 74


def night(air_db=-34, hum_db=-34.0, hum_rise_db_per_s=0.3753, whine_db=-52, whine_width_hz=170):
    """Nearly even outdoor noise, a distant machine's slowly rising drone and a thin wandering whine."""
    turn = np.arccos(np.clip(along(AIR_LIKENESS), -1, 1)) / 2
    mid_side = amp(along(AIR_COLOUR)) * np.array([np.cos(turn), np.sin(turn)])
    mid, side = filtered(rng.standard_normal((2, N)), mid_side)
    air = unit(np.array([mid + side, mid - side])) * amp(air_db + wobble(3.17) / 2)

    bands = sum(amp(db) * np.abs(resonance(hz, width)) ** 2 for hz, width, db in HUM_BANDS)
    drone = unit(filtered(rng.standard_normal(N), bands))
    drone = drone * amp(hum_db + hum_rise_db_per_s * TIME)

    # slow noise on a sine carrier makes a narrow band around the whine's pitch
    fuzz = unit(filtered(rng.standard_normal((2, N)), np.exp(-(FREQ / whine_width_hz) ** 2)))
    whine_hz = WHINE_HZ + WHINE_RISE_HZ_PER_S * TIME + WHINE_WANDER_HZ * wobble(1.5)
    whine = unit(fuzz * np.sin(2 * np.pi * np.cumsum(whine_hz) / SR))
    return air + drone + amp(whine_db) * whine


def scene():
    """Both hens and the claws on the patio at night."""
    return patio(beamed(hen()) + other_hen() + claws()) + night()


TOP_HZ = 15000  # band limit of the microphone chain


def record(dry, ceiling=1.09):
    """A fast limiter eases peaks to just over full scale, clipping trims them, then the band is limited."""
    needed = np.minimum(1, ceiling / (np.abs(dry) + 1e-9))
    gain = minimum_filter1d(needed, size=120, axis=1)
    gain = uniform_filter1d(gain, size=120, axis=1)
    return filtered(np.clip(dry * gain, -1, 1), FREQ < TOP_HZ)


dry = scene()
out = record(dry)
unload_wav(out)
```